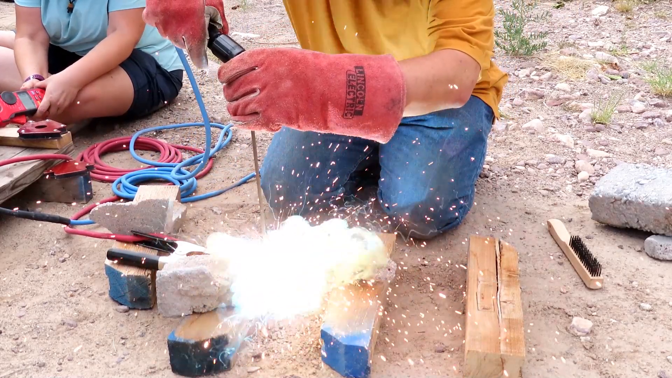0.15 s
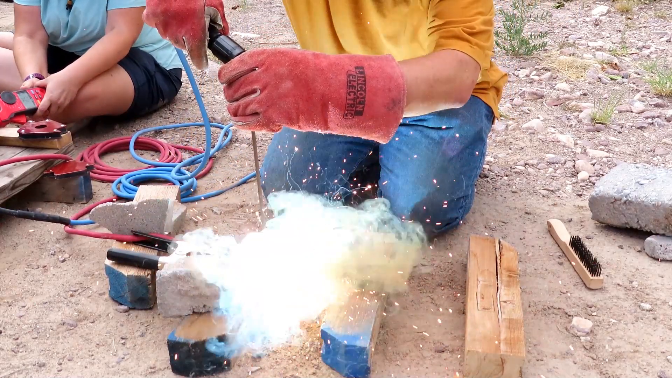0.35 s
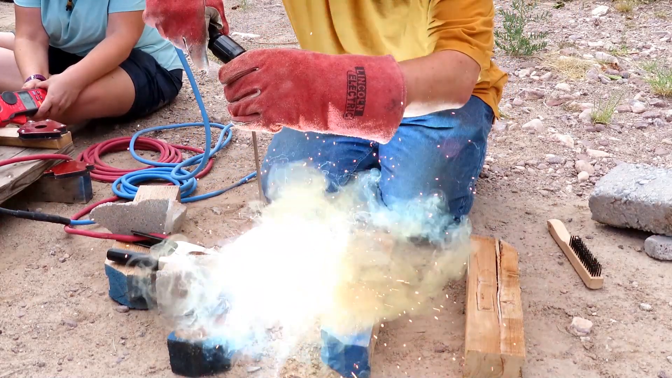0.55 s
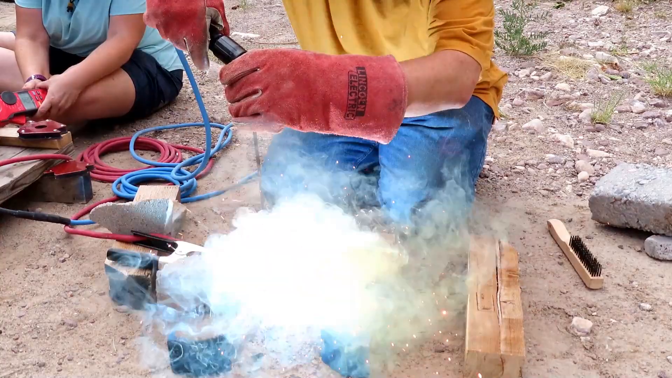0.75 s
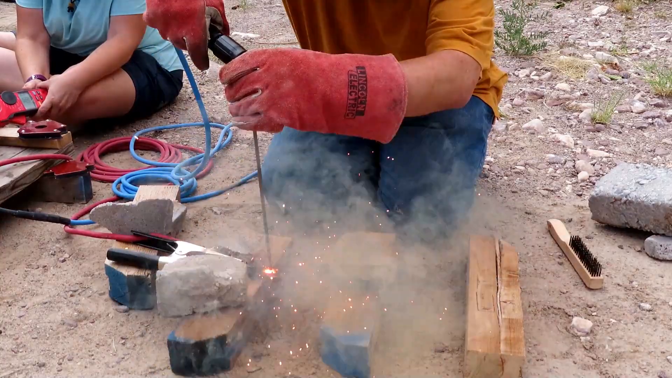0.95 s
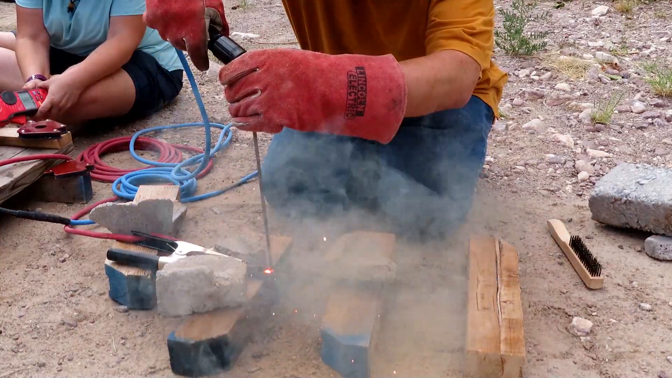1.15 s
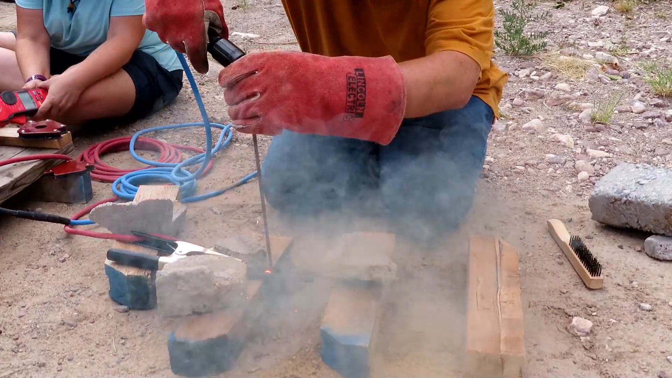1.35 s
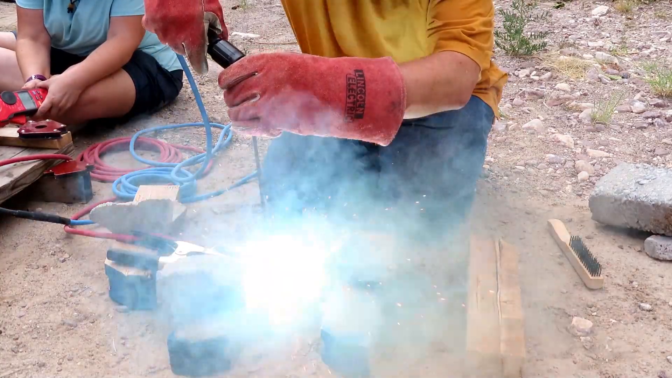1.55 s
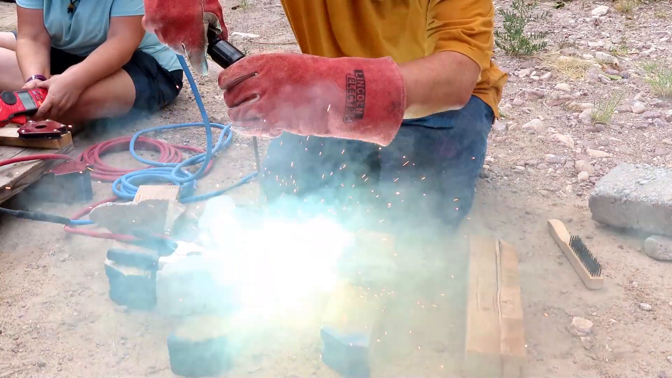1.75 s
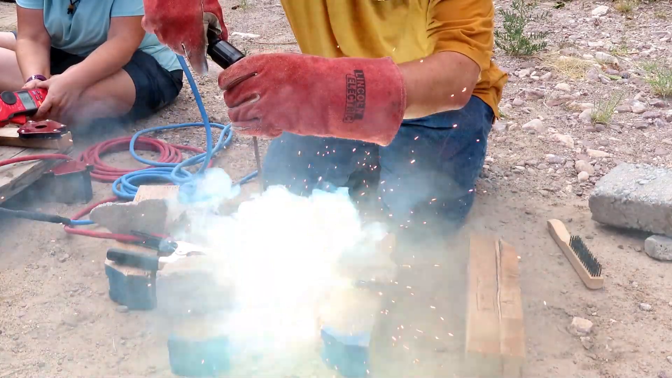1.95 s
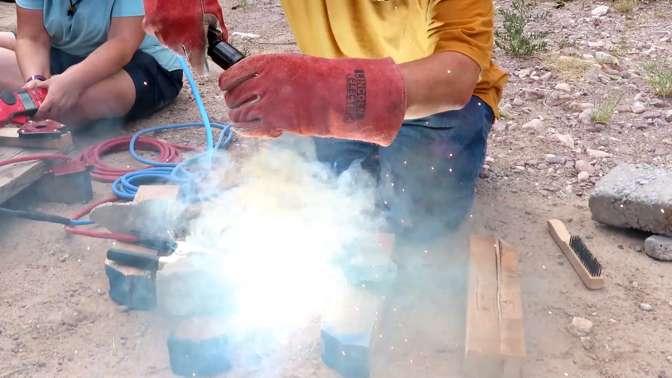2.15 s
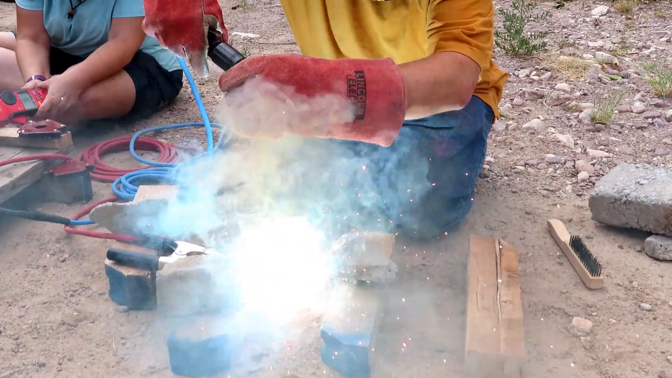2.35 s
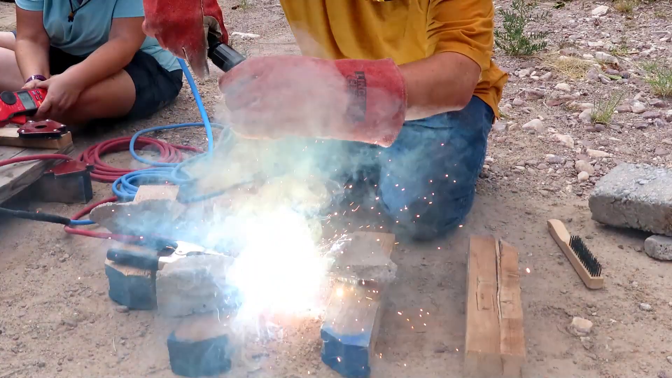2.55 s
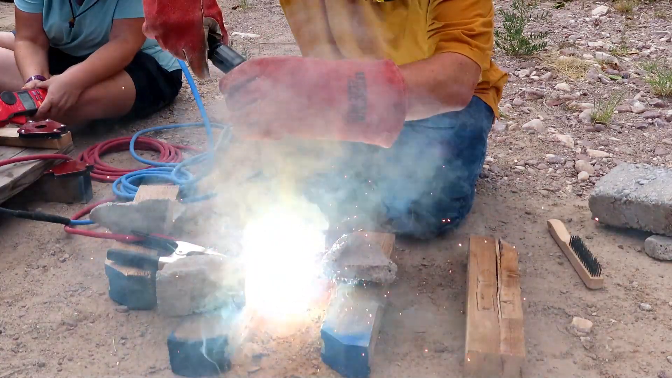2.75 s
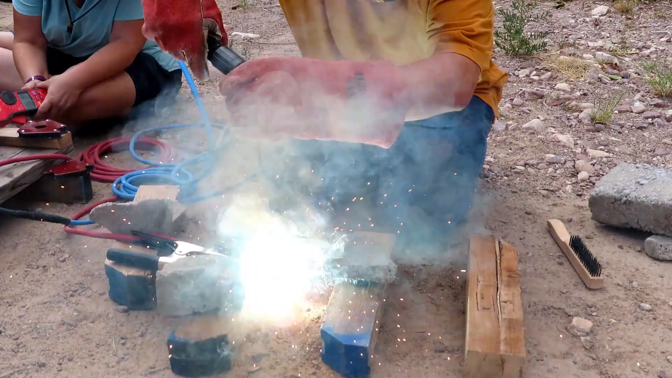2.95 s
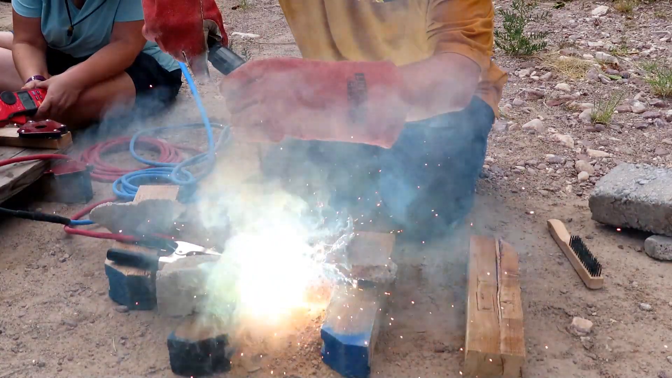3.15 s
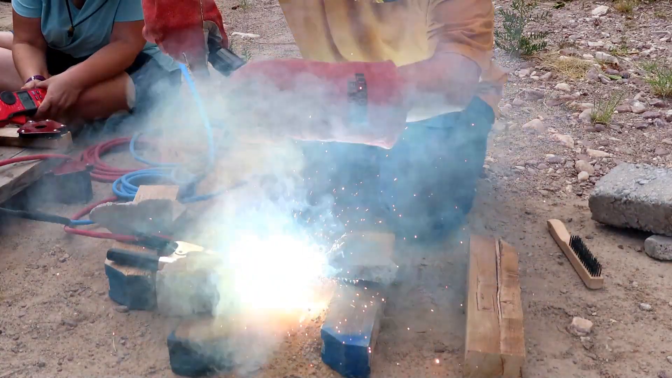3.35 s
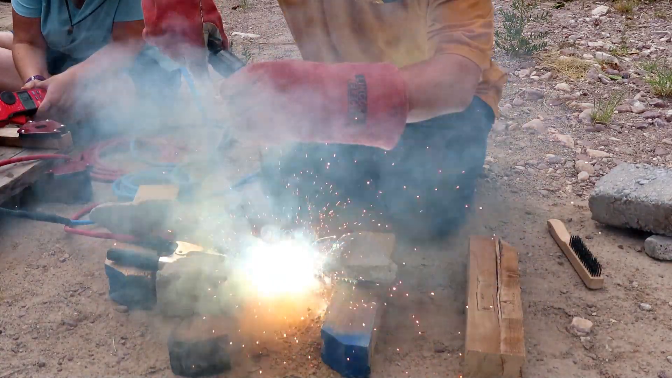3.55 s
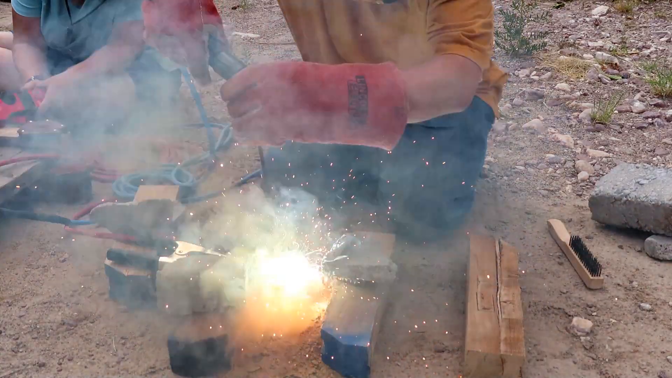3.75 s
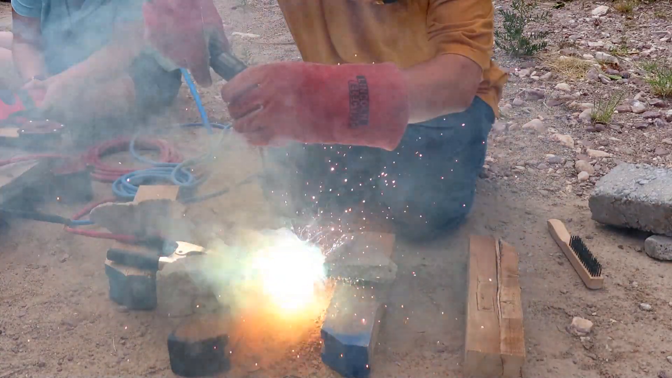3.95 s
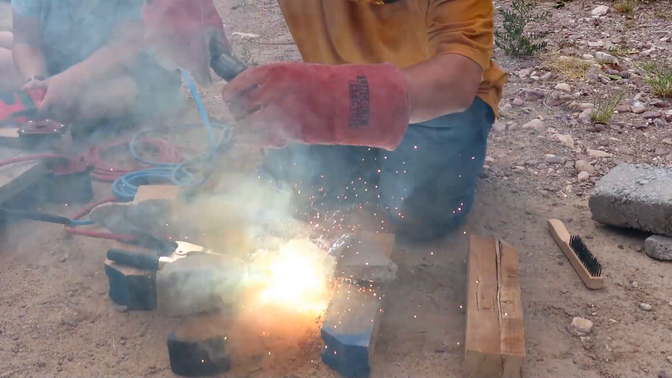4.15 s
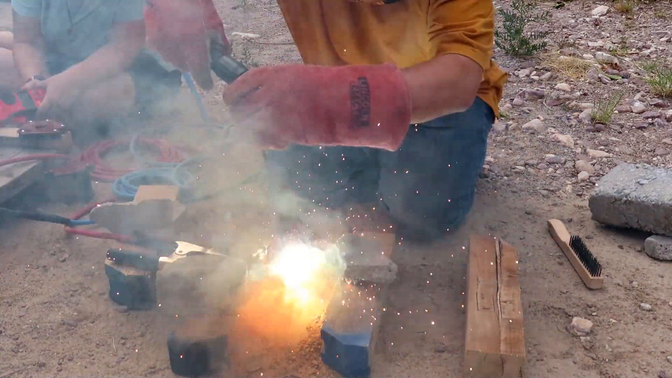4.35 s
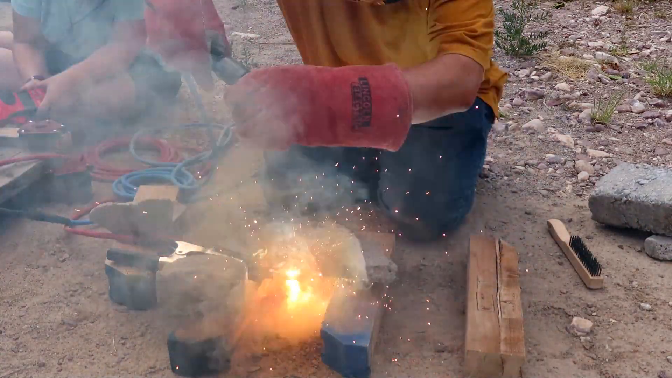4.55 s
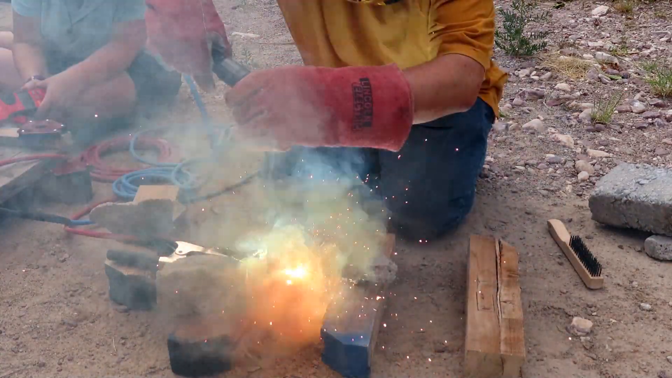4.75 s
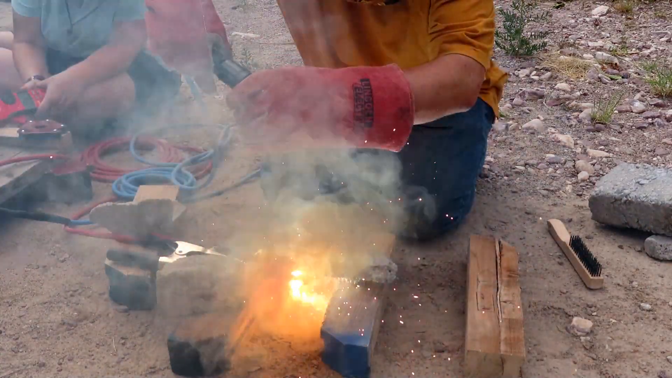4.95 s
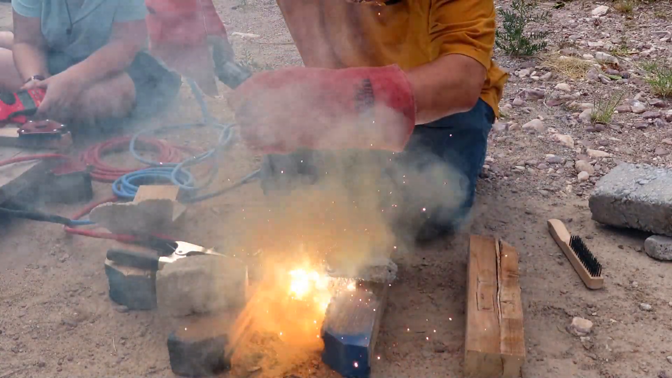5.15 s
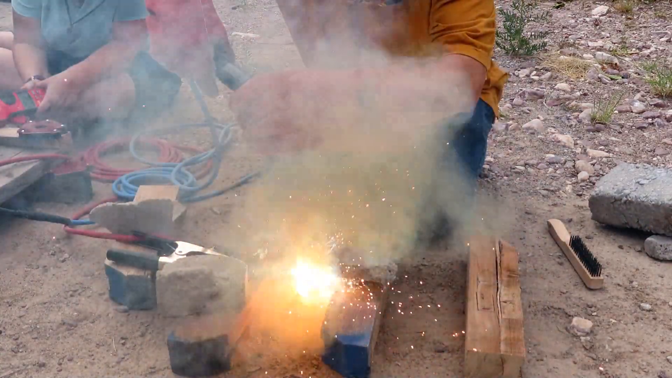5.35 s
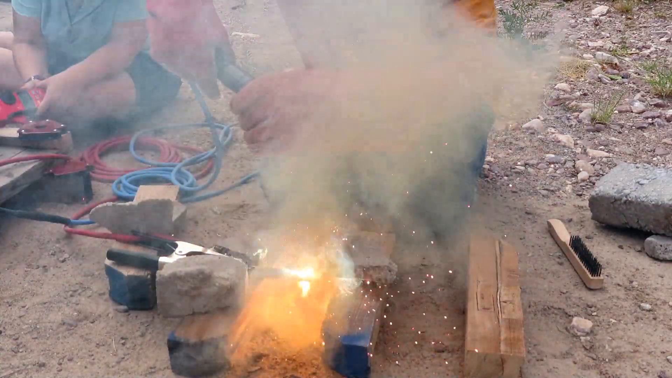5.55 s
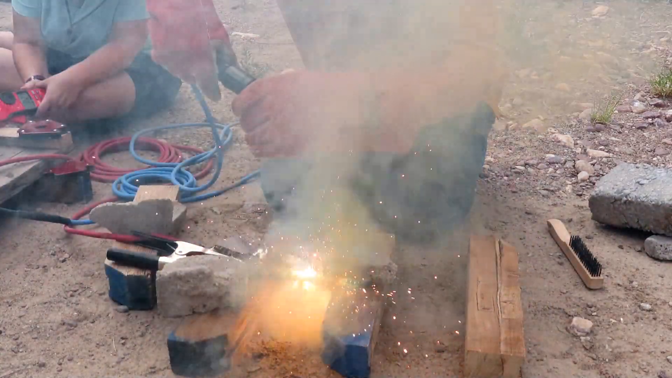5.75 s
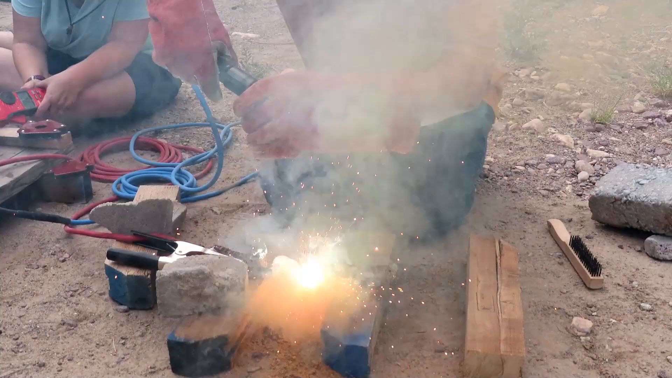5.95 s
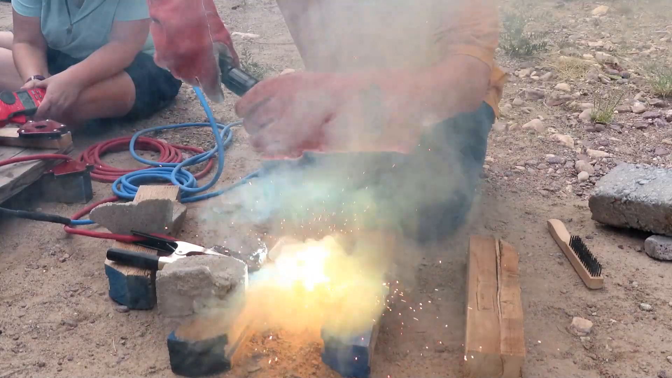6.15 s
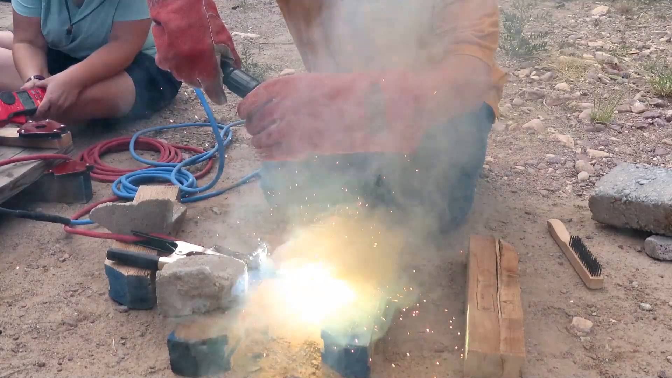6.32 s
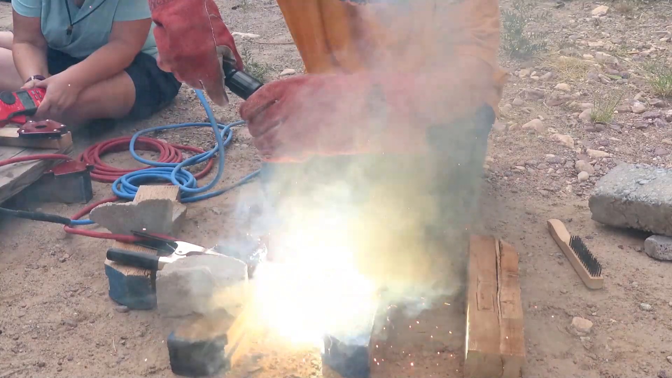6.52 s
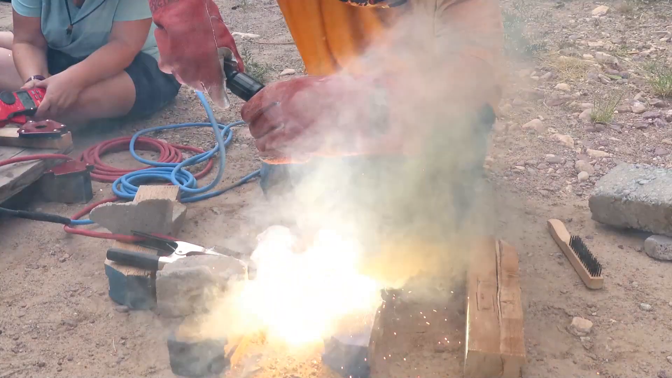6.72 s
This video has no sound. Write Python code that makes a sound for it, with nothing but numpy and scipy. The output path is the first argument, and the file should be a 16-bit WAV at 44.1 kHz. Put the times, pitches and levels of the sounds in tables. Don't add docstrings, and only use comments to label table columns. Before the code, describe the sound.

A welding rod burns against steel: a dense, bright frying hiss, ragged sputters and hard crackles of bursting metal, with low boxy resonance from the bricks around it. It stops abruptly near one second, pauses in faint outdoor air, then starts again duller and swells. Tiny dropouts chop the sizzle throughout. Close, dry open-air pickup, slightly overloaded on the loudest snaps.

```python
import sys
import numpy as np
from scipy import signal
from scipy.io import wavfile
from scipy.ndimage import uniform_filter1d

SR = 44100
rng = np.random.default_rng(int(sys.argv[2]) if len(sys.argv) > 2 else 0)


def dump_mix(stems):
    frames = np.atleast_2d(stems).T
    limited = np.clip(frames, -1, 1)
    pcm = np.round(limited * 32767).astype(np.int16)
    wavfile.write(sys.argv[1], SR, pcm)


def gain_from_db(level_db):
    decades = np.asarray(level_db, float) / 20
    return 10 ** decades


N = 303408
T = np.arange(N) / SR

# start [s], end [s].
BURNS_S = [
    (0.0, 1.038),
    (1.56, 6.9),
]
# time [s], distance factor (near echo delays follow its
GAP_FACTOR = [
    (0, 1.16),
    (1.5, 1.054),
    (2.5, 1.093),
    (3.6, 0.96),
    (4.7, 0.7),
    (5.6, 0.76),
    (6.88, 0.68),
]
OUT_S, STRIKE_S = BURNS_S[0][1], BURNS_S[1][0]
WALL_S, WALL_GAIN = 0.0062, 0.25


def evened(x):
    return x / np.sqrt(np.mean(x ** 2) + 1e-20)


def read(points, hz):
    f, value = np.transpose(points)
    return np.interp(np.log(hz + 1), np.log(f + 1), value)


def at_times(points, s):
    return np.interp(s, *np.transpose(points))


def delayed(x, delay_s):
    return np.interp(T - delay_s, T, x)


def lowpassed_or_band(x, order, hz, kind):
    return signal.sosfilt(signal.butter(order, hz, kind, fs=SR, output="sos"), x)


def wander(top_hz):
    return evened(lowpassed_or_band(rng.standard_normal(N), 2, top_hz, "low"))


def drift(s, top_hz):
    hz = np.geomspace(top_hz / 10, top_hz, 12)[:, None, None]
    return evened(np.sin(2 * np.pi * (hz * s + rng.random(hz.shape))).sum(axis=0))


def shaped(x, gain):
    hz, s, z = signal.stft(x, SR, nperseg=1024, noverlap=768)
    return signal.istft(z * gain(hz[:, None], s[None]), SR, nperseg=1024, noverlap=768)[1][:N]


def resonate(x, hz, width_hz):
    return signal.lfilter(*signal.iirpeak(hz, hz / width_hz, SR), x)


def narrow_noise(hz, width_hz):
    return evened(resonate(resonate(rng.standard_normal(N), hz, width_hz), hz, width_hz))


def yard():
    # frequency [Hz], level [dB per Hz].
    air_spectrum = [(22, -5), (50, -18), (85, -17), (160, -19.5), (280, -29.5), (1700, -39.5),
                    (2800, -53.5), (15700, -67)]
    # frequency [Hz], width [Hz], level [dB rms].
    insects = [(3400, 300, -92), (4200, 200, -92)]
    air = shaped(rng.standard_normal(N), lambda hz, s: gain_from_db(read(air_spectrum, hz) + 0 * s))
    trills = sum(gain_from_db(db) * narrow_noise(hz, width_hz) for hz, width_hz, db in insects)
    return gain_from_db(-54.5 + wander(top_hz=10)) * evened(air) + trills


def generator():
    # frequency [Hz], level [dB rms].
    orders = [(71, -59.5), (96, -62.5), (120, -65.5), (185, -72), (333, -79.5)]
    return sum(gain_from_db(db) * narrow_noise(hz, width_hz=5) for hz, db in orders)


def surroundings(x):
    # frequency [Hz], decay time t60 [s].
    decay = [(300, .18), (2000, .2), (6000, .24), (14000, .24)]
    taps = rng.standard_normal(SR // 2) * (np.arange(SR // 2) > 300)
    hz, s, z = signal.stft(taps, SR, nperseg=256)
    tail = signal.istft(z * gain_from_db(-60 * s / read(decay, hz)[:, None]), SR, nperseg=256)[1]
    return signal.fftconvolve(x, tail / np.linalg.norm(tail))[:N]


def pocket(hz, s, start, end, centre_hz, width_hz, db):
    u = np.clip((s - start) / (end - start), 0, 1)
    return db * np.minimum(6 * u * (1 - u), 1) * np.exp(-(2 * (hz - centre_hz) / width_hz) ** 2)


def bricks(hz, s):
    # delay [ms], gain.
    things = [(1.5, 0.045), (1.95, -0.00035), (2.8, -0.016), (3.2, -0.033), (4.6, 0.062), (6.37, 0.29),
              (11.4, 0.41)]
    # start [s], length [s], first frequency [Hz], last frequency [Hz], level [dB].
    sliding_pockets = [(-.4, 1.7, 7550, 7800, 4.5), (-.4, 1.6, 6850, 7200, -4.5), (-.3, 1.5, 6100, 5700, -3),
                       (-.2, 1.5, 4150, 4200, 3), (-.2, .4, 4900, 4900, 3.5), (.2, .9, 5150, 5200, 2),
                       (.15, .12, 920, 1600, 4.5), (.35, .7, 1950, 1900, 2), (1.5, .7, 7850, 7650, 4),
                       (1.7, .6, 7100, 7300, -3.5), (1.65, .9, 5550, 5600, -5), (2.3, 1.9, 5700, 5850, -2.5),
                       (1.9, .7, 6450, 6750, 3), (2.2, 1, 7450, 7600, 2), (2.2, 1.3, 8400, 8550, 2.5),
                       (2.8, 1.4, 6900, 7150, 4), (2.5, 1.3, 7950, 8200, -3), (2.1, 1, 4200, 4100, 2.5),
                       (1.5, .6, 4250, 4050, 2), (1.9, 2.8, 4850, 5150, 3), (1.7, .75, 1550, 1350, 3),
                       (2.4, .7, 1800, 1850, .5), (2.4, .7, 2950, 2950, -3), (3.1, 1, 3750, 3800, -3),
                       (3.5, 1.5, 7650, 8300, 5), (3.5, 1, 8650, 9100, -3), (3.9, 1.15, 6650, 7300, -4.5),
                       (4.55, 1.1, 6200, 6850, 5), (4.7, 1.3, 5700, 6050, -3), (4.7, 1.3, 7600, 7850, -2),
                       (5.4, .9, 8700, 8600, 3.5), (5.5, 1, 7150, 7200, 3), (5.8, 1.5, 3600, 4300, 3.5),
                       (6.3, .9, 2700, 3100, 2), (6.35, .6, 8150, 8200, 3), (6.45, .7, 6800, 6550, -4),
                       (4.8, 1.6, 3700, 4300, -2.5),
                       (.2, .65, 10600, 10550, 5.5), (0, .45, 11500, 11550, 4.5), (.15, .7, 9800, 9900, -4),
                   (.5, .4, 13100, 13200, 4), (.2, .3, 13000, 13200, 3), (-.1, .35, 12900, 12900, -3),
                   (.55, .6, 11500, 11900, -3), (.8, .5, 10200, 10200, 4), (1.75, .5, 11500, 11600, 4.5),
                   (1.5, .3, 12900, 12900, 3), (1.6, .45, 12200, 12200, -3), (1.75, .5, 13600, 13800, 3),
                   (1.7, 1.05, 9400, 9200, 4.5), (2.75, 1.05, 9250, 9600, 4.5), (2, .95, 10500, 10100, -4),
                   (3, .8, 10300, 10300, -3.5), (2.15, .95, 13000, 12600, 4),
                   (2.75, 1.35, 11600, 13300, -4), (3.6, .65, 12200, 12300, 4), (3.7, .85, 12700, 12700, 3),
                   (3.85, 1, 10000, 9700, -3.5), (4.2, .35, 10550, 10550, 5), (4.8, .4, 10450, 10400, 3),
                   (4.95, .65, 11900, 12000, 4.5), (5.5, .5, 11100, 11100, 2), (5.7, .5, 11500, 12000, -3),
                   (6.05, 1.2, 11300, 11500, 4), (5.9, 1.2, 8950, 9700, -3.5), (5.7, .7, 12900, 12900, 2.5),
                   (6.5, .4, 10700, 10800, 3), (2, 2.2, 14200, 14400, 1.5)]
    # start [s], end [s], frequency
    # [Hz], width [Hz], level [dB].
    seams = [(0, 3.4, 3600, 250, -4), (3.5, 6.9, 3325, 150, -6), (3.5, 6.9, 3155, 110, 4.5),
             (3.5, 6.9, 2745, 90, -4), (3.8, 6.9, 4330, 120, -4), (0, 3.6, 795, 150, -6),
             (4.5, 7.6, 2050, 800, -3.5), (.1, 1.1, 1080, 250, -5), (2.2, 3.6, 1000, 350, -4),
             (6.3, 7.3, 2200, 800, -5), (3.4, 6.6, 1150, 450, -2.5), (1.9, 4.2, 13500, 5000, 2.5),
             (4.2, 5.7, 14200, 3500, -2.5)]
    turn = -2j * np.pi * hz / 1000
    gap = at_times(GAP_FACTOR, s)
    faces = 16
    delays_ms = np.geomspace(1.1, 5.5, faces) * rng.uniform(.93, 1.07, faces)
    smoke = [drift(s, top_hz=4) for _ in delays_ms]
    near = sum(.058 * w * np.exp(turn * ms * np.sqrt(gap)) for ms, w in zip(delays_ms, smoke))
    still = sum(g * np.exp(turn * ms) for ms, g in things)
    colour_db = sum(pocket(hz, s, *row) for row in seams)
    for start, length, first_hz, last_hz, db in sliding_pockets:
        end = start + length
        centre_hz = np.interp(s, (start, end), (first_hz, last_hz))
        depth_db = 0.89 * db * (1 + .22 * drift(s, top_hz=9))
        colour_db = colour_db + pocket(hz, s, start, end, centre_hz, 690, depth_db)
    return (1 + near) * (1 + still) * gain_from_db(colour_db)


def hollow(x):
    # frequency [Hz], width [Hz], level [dB].
    modes = [(175.5, 81, -2.5), (372, 86, -3.5), (447, 130, -3.5), (640, 66, 1.5), (882, 73, -12.5)]
    rings = []
    for k, (hz, width_hz, db) in enumerate(modes):
        width_hz = max(width_hz, 76)
        rings.append((-1) ** k * gain_from_db(db) * resonate(x, hz, width_hz))
    sunk = np.clip(3 * (1.1 - at_times(GAP_FACTOR, T)), 0, 1.5)
    ring = lowpassed_or_band(sum(rings[:-1]) + sunk * rings[-1], 2, [125, 900], "band")
    return ring + WALL_GAIN * delayed(ring, WALL_S)


def through(s):
    return np.maximum(s - 6.35, 0)


def state_db(s, base_db, flare_db, sink_db, flare_s):
    since = np.where(s >= STRIKE_S, s - STRIKE_S, s)
    gap = np.array(GAP_FACTOR)[:, 1]
    sunk = (gap[0] - at_times(GAP_FACTOR, s)) / (gap[0] - gap[-1])
    return base_db + flare_db * np.exp(-since / flare_s) + sink_db * sunk


def shorts_db():
    # start [s], length [s], drop [dB].
    shorts = [(0.281, .035, 3.5), (0.374, .01, 3.5), (0.51, .01, 2.5), (0.858, .02, 1.5), (0.916, .01, 3.5),
              (0.939, 0.009, 8.5), (2.385, 0.0182, 4.5), (2.788, .008, 0.5), (3.74, 0.016, 3),
              (5.085, 0.026, 4), (5.65, 0.01, 6), (5.941, 0.023, 2.5), (6.124, 0.034, 3.5),
              (6.174, 0.018, 4), (6.864, .012, 3.5), (0.681, 0.033, 1), (0.787, 0.032, 11),
              (0.993, 0.028, 9.5), (2.055, 0.016, 3), (2.17, 0.082, 7), (2.415, 0.033, 3), (2.53, 0.016, 2),
              (2.675, 0.024, 8.5), (2.847, 0.038, 7), (2.873, 0.019, 7.5), (3.087, 0.023, 3),
              (3.314, 0.012, 7.5), (3.371, 0.0299, 8.5), (3.395, 0.025, 7.5), (3.463, 0.03, 3.5),
              (3.64, 0.01, 3.5), (3.718, 0.018, 4), (4.082, 0.012, 4.5), (4.165, 0.013, 1),
              (4.455, 0.042, 4), (4.564, 0.025, 3), (4.947, 0.03, 7), (5.273, 0.043, 9.5),
              (5.605, 0.017, 13), (5.637, 0.018, 8.5), (5.907, 0.02, 5.5), (6.446, 0.025, 3),
              (6.613, 0.043, 10.5), (6.81, 0.0079, 3), (2.162, 0.0046, 1), (3.424, .01, 4.5),
              (5.515, .03, 2.5), (5.555, .03, 2), (4.936, .012, 6.5), (3.316, .016, 2.5)]
    t = T[::22]
    recover_s = 0.015
    drops = [db * (t >= s) * np.exp(-np.maximum(t - s - length, 0) / recover_s) for s, length, db in shorts]
    return np.interp(T, t, np.minimum(0.81 * np.max(drops, axis=0), 12))


def surges_db():
    # start [s], length [s], rise [dB].
    surges = [(.63, .05, 1.5), (0.95, .04, 1), (2.02, .043, 2.5), (2.473, 0.05, 3.5), (2.797, 0.038, 1),
              (3.04, 0.028, 1.5), (3.669, 0.037, 2.5), (3.873, .035, 2), (3.99, 0.034, 0.5),
              (4.42, 0.055, 2.5), (4.532, .028, 0.5), (4.897, 0.045, 2), (5.057, 0.033, 0),
              (5.657, 0.066, 0.5), (6.07, .06, 0.5)]
    t = T[::22]
    rises = [db * np.clip((t - s) / .006, 0, 1) * (t < s + length) for s, length, db in surges]
    return np.interp(T, t, np.sum(rises, axis=0))


def burning(share):
    # time [s], level [dB].
    current = [(0, -22), (.06, -24.5), (.3, -28), (.75, -29.5), (.9, -32.5), (1.04, -33.5), (1.56, -35.5),
               (1.6, -31.5), (1.8, -31.5), (2.3, -30), (2.75, -33), (2.97, -29), (3.35, -31.5), (3.75, -29),
               (4.25, -30), (4.5, -27.5), (6.55, -26.5), (6.88, -31.5)]
    lit = sum((T >= start) & (T < end) for start, end in BURNS_S)
    lit = lit + gain_from_db(-24) * np.clip((T - STRIKE_S) / 0.033 + 1, 0, 1) * (T < STRIKE_S)
    lit = lit + gain_from_db(-9) * np.exp(-np.abs(T - OUT_S) / 0.024) * (T >= OUT_S)
    level_db = at_times(current, T) + surges_db() - share * shorts_db()
    return uniform_filter1d(lit * gain_from_db(level_db), size=100)


def colour(hz, s):
    # frequency [Hz], level [dB per Hz].
    arc_spectrum = [(1340, 3.5), (2140, 3.5), (2390, 0.5), (3070, -1.5), (5750, -3), (8250, -4.5),
                    (12400, -9), (16000, -18.5)]
    body_db = state_db(s, base_db=-5, flare_db=3, sink_db=-2.5, flare_s=0.93) + 9.9 * through(s)
    body_db = body_db / (1 + (hz / 2000) ** 4)
    dull_db = -0.35 * np.interp(s, T, shorts_db()) - 5.9 * through(s)
    dull_db = dull_db - 7 * (np.abs(s - STRIKE_S) < .03)
    treble_db = state_db(s, base_db=-4, flare_db=12.5, sink_db=9.5, flare_s=0.72) + dull_db
    treble_db = treble_db / (1 + (9500 / (hz + 1)) ** 6)
    slag_db = -15.5 * ((s > OUT_S) & (s < STRIKE_S - .012)) / (1 + (3500 / (hz + 1)) ** 4)
    level_db = read(arc_spectrum, np.maximum(hz, 1300)) + body_db + treble_db + slag_db
    return gain_from_db(level_db) / (1 + (500 / (hz + 1)) ** 4)


def puffs(drive):
    low = evened(lowpassed_or_band(drive, 2, [75, 170], "band"))
    level_db = state_db(T, base_db=-13, flare_db=0, sink_db=-17, flare_s=1)
    level_db = level_db + 15 * through(T) + 4 * wander(top_hz=5.2)
    return gain_from_db(level_db) * burning(0.81) * low


def pop():
    blob = (-10, 0.00018)
    db, push_s = blob
    u = np.maximum(T - 2.1649, 0) / push_s
    blast = gain_from_db(db) * 2.36 * u * (2 - u) * np.exp(-u)
    blast = blast + delayed(blast, .0006) - 0.67 * delayed(blast, -.00045)
    return blast + gain_from_db(8.5) * hollow(blast) + 0.35 * delayed(blast, WALL_S)


def spits():
    # time [s],
    # peak [dB], thump relative to peak [dB].
    spit_rows = [(0.336, -14, -19), (0.418, -16.5, -7), (0.536, -10, -18), (0.735, -14, -15),
                 (0.844, -10, -17), (1.033, -10.5, -12), (1.614, -18.5, -7), (1.921, -5, -8),
                 (2.013, -19, -11), (2.14, -13.5, -16), (2.345, -8, -9), (2.364, -6, -16),
                 (2.473, -16, -15), (2.617, -12, -19), (2.705, -9.5, -17), (2.808, -20, -16),
                 (2.829, -11, -12), (2.918, -21, -26), (3.037, -10, -12), (3.139, -23, 3),
                 (3.249, -10, -18), (3.302, -10, -16), (3.357, -10, -15), (3.441, -10, -15),
                 (4.07, -9, -26), (4.42, -4, -14), (6.481, -6, -21), (6.753, -2, -17), (6.798, -8, -9),
                 (0.807, -28, -17), (1.022, -15.5, -29), (2.196, -18, -22), (2.224, -16, -25),
                (2.261, -18, -17), (2.693, -18, -22), (2.871, -31, -22), (3.398, -15, -13),
                (3.423, -22, -25), (3.462, -17, -9), (4.583, -23.5, 7), (4.97, -7, -23),
                (5.288, -10.5, -20), (5.321, -10, -11), (5.624, -13.5, -6), (6.644, -20, -15),
                (6.668, -15.5, -9),
                 (0.3157, -16, -14), (0.4925, -17, -9), (0.5873, -19, -8), (0.6442, -9, -9),
              (0.9303, -13.5, -14), (0.954, -14.5, -16), (0.9894, -18.5, -12), (1.561, -28, -11),
              (1.703, -20, -23.5), (1.8383, -16.5, -7), (1.9772, -10.5, -13), (2.1204, -21, -14),
              (2.2803, -20, -14), (2.305, -26, -19), (2.3217, -15, -12), (2.3815, -10, -12),
              (2.564, -20, -20), (2.6344, -15, -20), (2.653, -10, -25), (2.675, -15.5, -20),
              (2.74, -15, -17), (2.7694, -25, -22), (2.8448, -21, -15), (2.8785, -18, -16),
              (2.9033, -19, -20), (2.935, -9, -12), (2.971, -12.5, -8), (3.0001, -26, -18),
              (3.0125, -27, -19), (3.1844, -13, -6), (3.329, -9, -23), (3.449, -13, -10),
              (3.5173, -20, -17), (3.562, -12, -21), (3.622, -19, -8), (3.666, -14.5, -8),
              (3.6993, -13, -17), (3.771, -11.5, -14), (4.1024, -9, -26), (4.2043, -20, -12),
              (4.805, -25, -24), (4.8384, -14, -15), (4.9308, -5, -23), (4.995, -9, -21),
              (5.1243, -21, -17), (5.376, -10, -24), (5.9737, -11.5, -14), (6.5965, -12, -12),
              (6.7323, -17, -7), (1.5923, -20, -5), (2.452, -22, -18), (2.5846, -17, -13),
              (2.7243, -15, -21), (3.1124, -22, -18), (3.2326, -23, -18), (2.5992, -19, -15),
              (2.238, -19, -20), (3.345, -12, -18), (5.302, -21, -18), (1.104, -46, -20),
                 (3.883, -17, -19), (3.946, -20, -16), (3.989, -16, -16), (4.2693, -14.5, -11),
                  (4.3178, -23, -12), (4.3444, -27, -14), (4.379, -15, -9), (4.4857, -18, -16),
                  (4.569, -27, -12), (4.7444, -16, -19), (5.054, -9, -19), (5.1424, -17, -16),
                  (5.176, -16, -13), (5.245, -27, -16), (5.6557, -18, -21), (5.669, -21, -16),
                  (5.789, -9, -16), (6.1644, -18, -19), (6.2224, -20, -14), (6.257, -17, -9),
                  (6.3879, -12, -16), (6.68, -14, -16)]
    events = spit_rows
    t, bright, low = np.arange(600) / SR, np.zeros(N + 600), np.zeros(N + 600)
    swell_s = .0013
    snap_shape = t / swell_s * np.exp(1 - t / swell_s) + 0.06 * np.exp(-t / 0.0034)
    u = t / 0.00039
    push = u * (2 - u) * np.exp(-u)
    for s, db, thump_db in events:
        treble_db = -5.5 + 7.5 * np.tanh(rng.standard_normal())
        db = min(db, -10.5)
        snap = rng.standard_normal(600) * snap_shape
        dull = signal.lfilter([.3], [1, -.7], snap)
        at = slice(round(s * SR), round(s * SR) + 600)
        bright[at] += gain_from_db(db + 3) * dull + gain_from_db(db + treble_db) * (snap - dull)
        low[at] += gain_from_db(db + thump_db + 22) * push
    return bright[:N], low[:N]


def flickers():
    per_s, length_s = 30, .006
    draw = rng.random((N, 2))
    t = np.arange(round(length_s * SR)) / SR
    starts = (draw[:, 0] < per_s / SR) * (.5 + draw[:, 1])
    dips = signal.oaconvolve(starts, np.sin(np.pi * (t / length_s) ** 2) ** .5)[:N]
    return gain_from_db(-2 * np.minimum(dips, 2))


def plasma():
    # time [s], sputter strength [dB].
    unrest = [(0, -12), (.3, -2), (.45, -2.5), (1.04, 4.5), (1.56, -7), (1.9, -5), (2.1, 0), (2.6, -0.5),
              (3.4, 2), (4.2, 2), (4.6, -0.5), (5.4, -0.5), (5.7, 0), (6.4, -1.5), (6.88, 1.5)]
    sputters_per_s = 190
    draw = rng.random((N, 3))
    size = gain_from_db(0.93 * np.minimum(-np.log(draw[:, 0] + 1e-9), 3))
    beats = np.cumsum(sputters_per_s * np.exp(.7 * wander(top_hz=90.05))) / SR
    kicks = np.diff(np.floor(beats), prepend=0) * np.sqrt(size) * (0.28 + 0.66 * draw[:, 1])
    kicks = kicks * gain_from_db(at_times(unrest, T) - .6 * shorts_db())
    t = np.arange(400) / SR
    puff = t / 0.00044 * np.exp(1 - t / 0.0004) + 0.24 * np.exp(-t / 0.00055)
    sputter = signal.oaconvolve(kicks, puff)[:N]
    swell = gain_from_db(0.69 * wander(top_hz=35.4) + 0.91 * wander(top_hz=200)) * (1 + 2.1 * sputter)
    sparks = size * np.sign(draw[:, 1] - .3) * (draw[:, 2] < 2000 / SR)
    sparks = evened(signal.lfilter([1], [1, -.6], sparks))
    shove = signal.oaconvolve(kicks, t * np.exp(-t / 0.00056))[:N]
    push = resonate(shove, hz=653, width_hz=176)
    push = push + .5 * delayed(push, WALL_S)
    return evened(swell * (rng.standard_normal(N) + gain_from_db(-10) * sparks)), evened(push)


def arc():
    drive, push = plasma()
    gain = burning(0.95)
    drive = drive * flickers()
    snap, thump = spits()
    hiss = gain_from_db(5.5) * gain * evened(shaped(drive, colour))
    snap = gain_from_db(-1) * shaped(snap, colour)
    boom_db = state_db(T, base_db=-9.5, flare_db=7, sink_db=6, flare_s=0.44) + 7 * through(T)
    ringing = evened(hollow(drive)) * burning(0.74)
    boom = gain_from_db(boom_db) * (ringing + gain * push)
    direct = gain_from_db(-3.5) * shaped(hiss + snap, bricks)
    return direct + boom + gain_from_db(-5) * hollow(thump) + pop() + puffs(drive)


def scene():
    dry = arc()
    return (dry + gain_from_db(-19) * surroundings(dry) + yard() + generator())[None]


def low_pass(x):
    return signal.sosfilt(signal.butter(12, 16340, fs=SR, output="sos"), x)


def record(dry):
    heard = lowpassed_or_band(dry, 1, 20, "high")
    heard = .5 * np.tanh(heard / .5)
    band = signal.firwin(1201, 15770, window=("kaiser", 7), fs=SR)
    heard = signal.oaconvolve(heard, band[None], "same")
    return low_pass(heard)


dry = scene()
out = record(dry)
dump_mix(out)
```